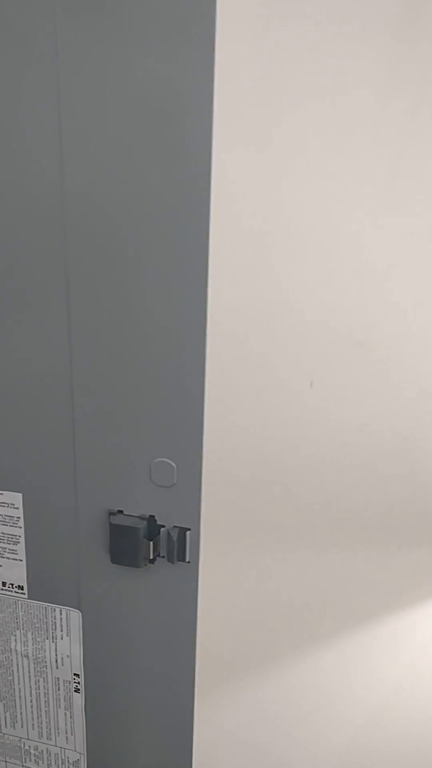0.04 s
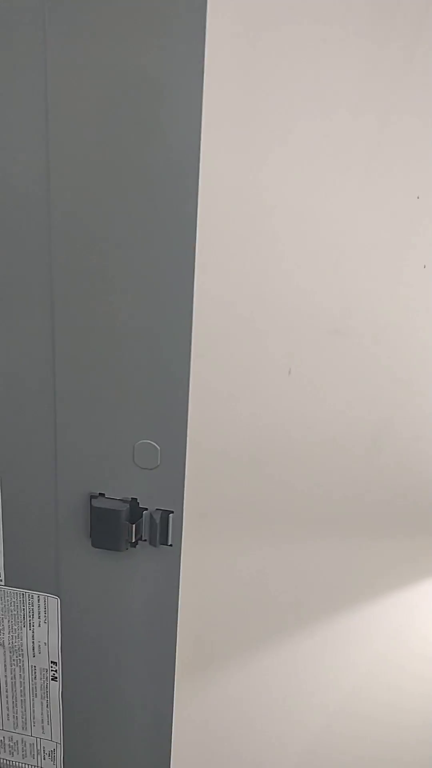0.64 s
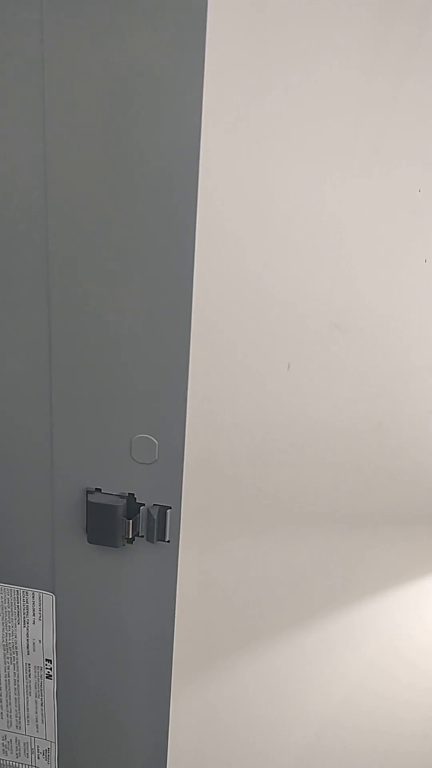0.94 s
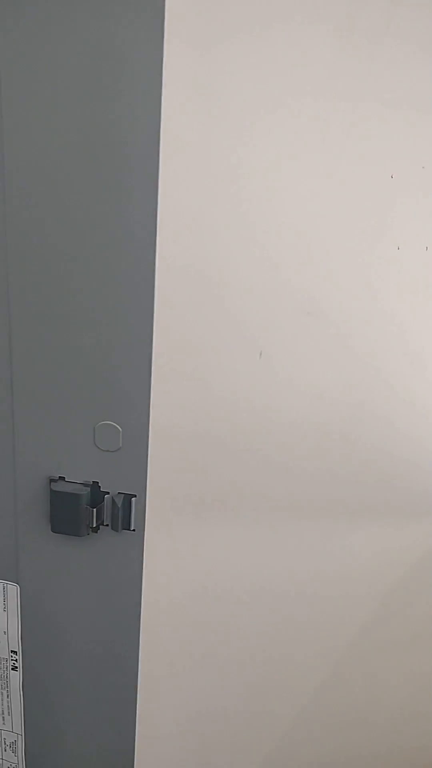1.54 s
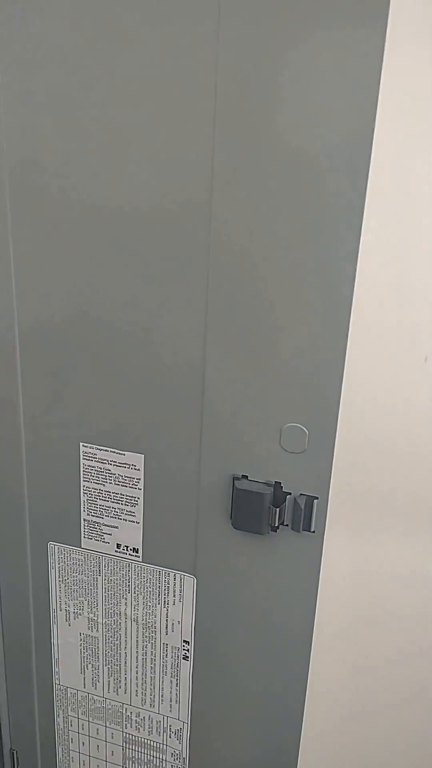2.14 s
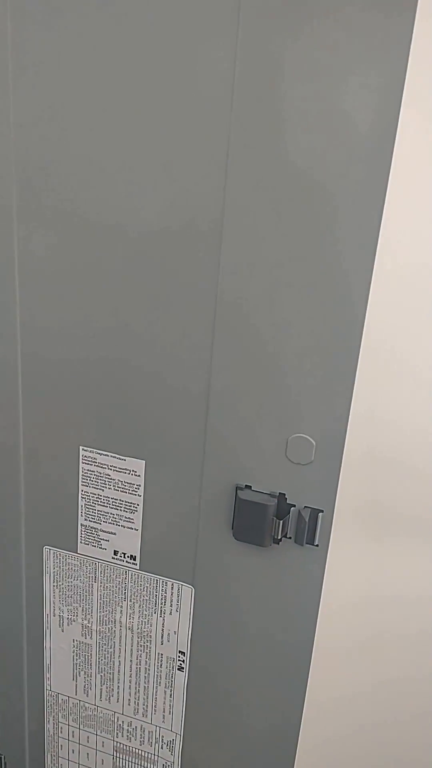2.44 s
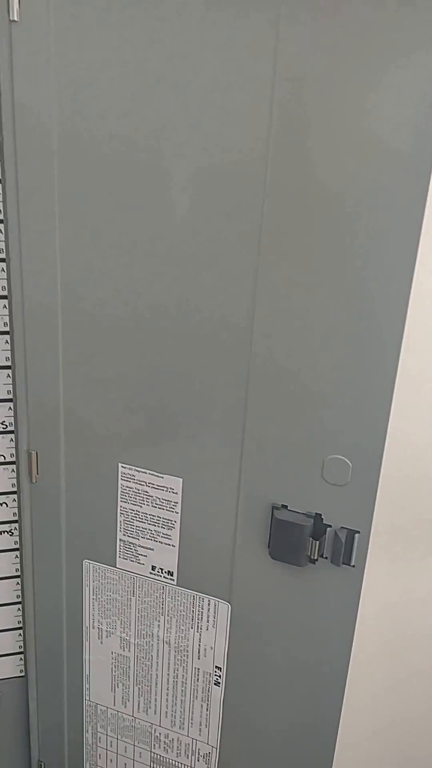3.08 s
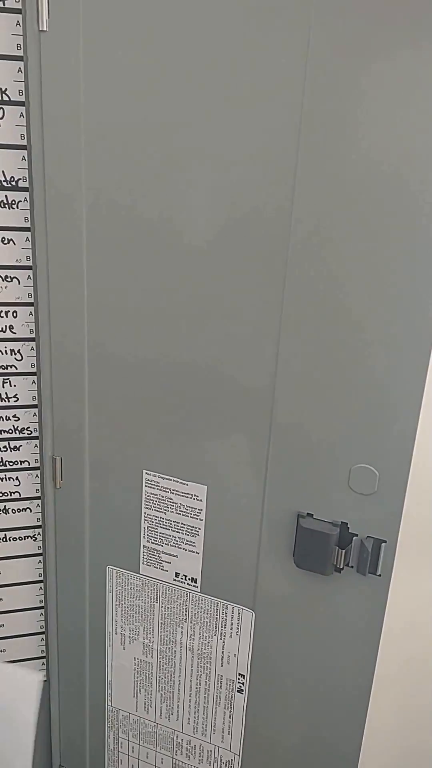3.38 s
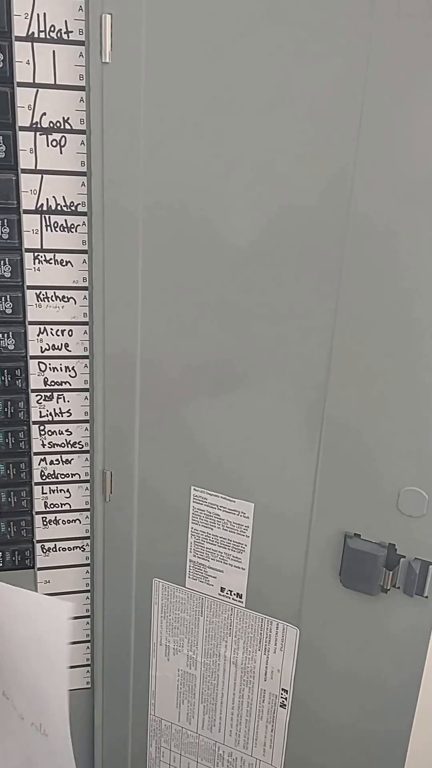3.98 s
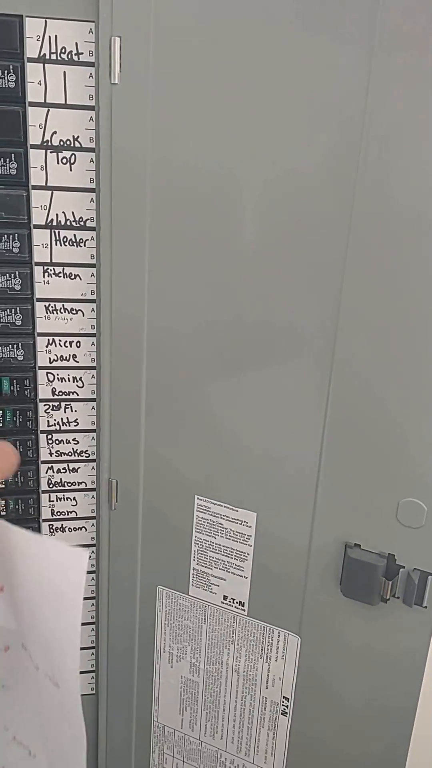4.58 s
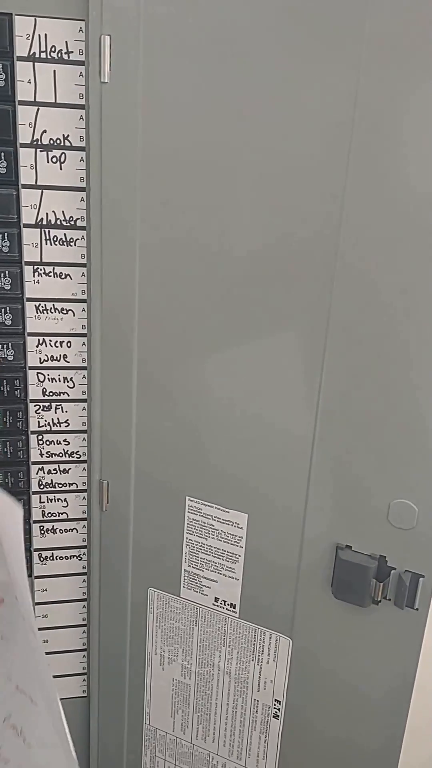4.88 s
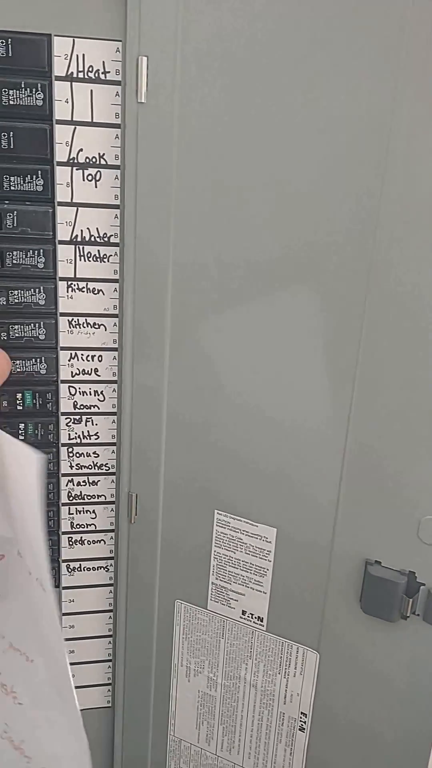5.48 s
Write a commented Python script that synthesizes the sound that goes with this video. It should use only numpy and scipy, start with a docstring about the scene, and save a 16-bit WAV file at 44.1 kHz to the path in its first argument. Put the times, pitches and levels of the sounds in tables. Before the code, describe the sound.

Close by, a hand flips circuit breakers in a steel wall panel, seventeen sharp clicks at about three a second. Each snaps with a tiny plastic rattle and a knock from the metal box. The first five clack more fully, with a hollow thud on the second; the rest are brighter. Soft bumps and rustles fall between them, over faint hiss in a small, hard room.

```python
"""Circuit breakers click in a steel wall panel, close by: a hand flips five double ones, then twelve singles.
Each spring snaps over, rattles in its plastic case and knocks the steel box; a small hard room answers. A faint
low hum swells at the start, and a hollow thud follows the second flip. Between flips the hand bumps the panel
and rustles, over a faint room hiss."""
import sys
import numpy as np
from scipy import signal
from scipy.fft import rfft, irfft
from scipy.io import wavfile
from scipy.ndimage import uniform_filter1d

SR = 44100
rng = np.random.default_rng(int(sys.argv[2]) if len(sys.argv) > 2 else 0)


def to_wav(s):
    """Save 16-bit WAV."""
    ch = np.atleast_2d(s).T  # columns
    pcm = np.round(np.clip(ch, -1, 1) * 32767)  # PCM
    wavfile.write(sys.argv[1], SR, pcm.astype(np.int16))


N = 243431
SIZE = 32768  # samples in one short sound
T, HZ = np.arange(SIZE) / SR, np.fft.rfftfreq(SIZE, 1 / SR)

# A "colour" says how strong each frequency is; "t60" is the time a sound takes to fade by 60 dB.
# colour of the room's hiss: f/Hz, level/dB
HISS_COLOUR = [(15, -45.5), (25, -11), (70, -1), (249, -3.5), (354, -2.5), (531, -11), (840, -7),
               (962, -10), (1520, -9.5), (2760, -8.5), (8140, -18.5), (9840, -25), (14400, -45),
               (16000, -54.5)]
# loudness of the hiss over time: t/s, level/dB
HISS_LEVELS = [(0, -55), (.4, -56), (2.4, -52), (4.399, -51), (4.801, -54.5), (5.5, -56)]
# how alike left and right are in sound from all around: f/Hz, likeness/0-1
LIKENESS = [(60, .97), (300, 0.84), (600, .5), (1200, 0.15), (3000, 0.02), (12000, 0)]
# how long the room echoes: f/Hz, t60/s
ECHO_T60 = [(100, 0.45), (400, 0.6), (1200, 0.65), (2700, 0.5), (5000, 0.41), (8500, 0.29), (13000, 0.21)]
# colour of the echo against the direct sound: f/Hz, level/dB
ECHO_COLOUR = [(300, 11), (1000, 4), (3000, -2.5), (6000, -1), (9000, 0.5), (14000, 4)]

# rustles of the hand: t/s, level/dB, rise/s, brightness/dB per octave
RUSTLES = [(.048, -44.5, .006, -2.5), (1.84, -45, 0.0037, 9.5), (2.255, -42.5, .018, 2),
           (2.373, -43, .002, -2)]
# colour of a rustle: f/Hz, level/dB
RUSTLE_COLOUR = [(200, -19), (700, -1.5), (1200, 1), (2000, -6), (3200, -12.5), (6000, -32), (14000, -46)]
# the hand bumps the panel, mostly as it finds the next lever: t/s, level/dB
BUMPS = [(0.366, -46.5), (0.999, -52), (1.355, -43.5), (1.695, -42), (2.229, -45.5), (2.382, -49.5),
         (2.754, -41.5), (2.795, -38), (3.045, -40.5), (3.11, -39), (4.841, -53), (5.119, -42),
         (5.17, -44.5), (5.408, -51.5)]
# colour of a bump: f/Hz, level/dB
BUMP_COLOUR = [(30, -27.5), (65, 1.5), (100, -10), (170, -0.5), (330, -5), (550, -12.5), (900, -15.5),
               (2000, -21), (5000, -40), (10000, -56)]
# tones of the faint low hum: f/Hz, height/dB
HUM_TONES = [(345, 19.5), (575, 19.5), (770, 8)]
# colour of the hollow thud: f/Hz, level/dB
THUD_COLOUR = [(30, -38.5), (62, 7.5), (110, -5.5), (350, -3.5), (550, -10.5), (900, -16), (1500, -18),
               (2800, -16), (5000, -41), (10000, -55.5)]
# tones in the thud: f/Hz, height/dB
THUD_TONES = [(759, 11.5), (1030, 7), (1410, 12), (2640, 3), (3130, 4.5)]
# colour of the hollow wall's boom: f/Hz, level/dB
WALL_COLOUR = [(25, -30), (45, -13.5), (68, 6.5), (100, 1), (170, 2), (260, -10), (500, -52)]
# tones of the steel box: f/Hz, level/dB, t60/s
BOX_TONES = [(188.8, -8.5, 0.43), (239.5, -8, 0.6), (300.5, -0.5, 0.16), (335.9, -1, .22),
             (436.2, -2.5, 0.087), (475, -6, 0.093), (759, -11, 0.1), (2614, -14, 0.45),
             (2840, -10.5, 0.62)]

# colour shared by all the plastic cases: f/Hz, level/dB
CASE_COLOUR = [(150, -31), (500, -18.5), (1000, -19.5), (1700, -14.5), (2500, -10), (4500, -7.5),
               (6500, -2.5), (9700, -2), (11000, -7.5), (13000, -12.5), (15500, -18), (16500, -40.5)]
# tones of the wide case: f/Hz, height/dB
DOUBLE_MODES = [(2830, 7), (3740, 3.5), (6890, 4.5), (7580, 6)]
# tones of the narrow case: f/Hz, height/dB
SINGLE_MODES = [(2660, 4.9), (3650, 3.3), (6450, 1.3), (7940, 3.2), (8780, 2.5), (9580, 6.2)]
# the two kinds of breaker: case tones, fizz above 10 kHz/dB, lever slide/dB, left over right/dB
DOUBLE = (DOUBLE_MODES, -2.3, -18, -0.2)
SINGLE = (SINGLE_MODES, 0.3, -22, -0.7)
# one row a flip, levels relative; the two rings depend on the breaker's seat in the panel:
# t/s, kind, snap/dB, mid-range clack/dB, lower ring/Hz, upper ring/Hz, box knock/dB, wall boom/dB
FLIPS = [(0.136, DOUBLE, -22.5, 5, 2640, 8450, -44, -48), (0.474, DOUBLE, -23.5, 3, 2640, 5630, -41.5, -50),
         (0.803, DOUBLE, -24.5, 4.5, 2545, 7590, -41, -47), (1.128, DOUBLE, -25, 6, 3770, 3950, -43, -51.5),
         (1.432, DOUBLE, -25, 5, 4140, 5990, -38.5, -50.5),
         (1.688, SINGLE, -20, -1.5, 3370, 4500, -45.5, -50.5),
         (2.01, SINGLE, -20, -2.5, 4270, 7920, -38, -51), (2.5467, SINGLE, -20.5, -3, 8340, 9490, -40, -53),
         (2.831, SINGLE, -17, -4, 2143, 6610, -38.5, -52.5),
         (3.1763, SINGLE, -18, -2, 2590, 7040, -42.5, -54.5),
         (3.491, SINGLE, -16, -2.5, 2587, 6700, -42.5, -52),
         (3.798, SINGLE, -19, -3.5, 4850, 7080, -44.5, -51.5),
         (4.119, SINGLE, -19.5, 0, 8770, 9550, -42.5, -56),
         (4.374, SINGLE, -17.5, -3, 2400, 9320, -45.5, -60),
         (4.934, SINGLE, -22, -1.5, 2587, 8360, -42, -53.5),
         (5.165, SINGLE, -21.5, -0.5, 4820, 10450, -40.5, -46.5),
         (5.503, SINGLE, -22.5, -5.5, 5920, 10600, -39.5, -45)]


def amp(db):
    """Turns decibels into a gain."""
    return 10 ** (np.asarray(db) / 20)


def unit(x):
    """Scales a sound to an energy of one per channel."""
    return x / np.sqrt(np.mean(np.sum(x ** 2, -1)) + 1e-20)


def curve(points, hz=HZ):
    """Joins (frequency, value) points on a log-frequency axis."""
    f, value = np.transpose(points)
    return np.interp(np.log(hz + 1), np.log(f + 1), value)


def peaks(tones, width_hz):
    """Turns (frequency, height) tones into peaks on a colour."""
    return sum(db / (1 + (2 * (HZ - hz) / width_hz) ** 2) for hz, db in tones)


def wiggle(shape, width):
    """Smooth random curves, typically one away from zero."""
    x = uniform_filter1d(uniform_filter1d(rng.standard_normal(shape), width), width)
    return x / x.std()


def add(mix, s, sound):
    """Mixes a stereo sound in at s seconds."""
    part = mix[:, round(s * SR):][:, :sound.shape[1]]
    part += sound[:, :part.shape[1]]


def stereo(a, b, likeness):
    """Makes left and right of a given likeness from two unrelated sounds."""
    mid, side = np.sqrt((1 + likeness) / 2) * a, np.sqrt((1 - likeness) / 2) * b
    return np.array([mid + side, mid - side])


def wide_noise(colour_db, size=SIZE):
    """Noise from all around: left and right are alike only in the bass."""
    white = rfft(rng.standard_normal((2, size)))
    spectrum = stereo(*white, curve(LIKENESS, np.fft.rfftfreq(size, 1 / SR)))
    x = irfft(spectrum * amp(colour_db), size)
    return x / x.std()


def hiss():
    """The quiet air of the room."""
    level_db = np.interp(np.arange(N) / SR, *np.transpose(HISS_LEVELS))
    return amp(level_db) * wide_noise(curve(HISS_COLOUR, np.fft.rfftfreq(N, 1 / SR)), N)


def room_echo(build_s=0.014):
    """A fresh echo from the hard walls; the treble dies first."""
    hz, t, bands = signal.stft(wide_noise(curve(ECHO_COLOUR)), SR, nperseg=256)
    fade = amp(-60 * t / curve(ECHO_T60, hz)[:, None])
    tail = signal.istft(bands * fade, SR, nperseg=256)[1][:, :SIZE]
    return unit(tail * (1 - np.exp(-T / build_s)))


def tilt(db_per_octave):
    """A slope that makes a colour brighter (above zero) or duller."""
    return db_per_octave * np.log2(HZ + 20)


def low_hum(level_db=-67.1, rise_s=0.145):
    """A faint hum of three low tones swells, then fades."""
    swell = T / rise_s * np.exp(1 - T / rise_s)
    colour = curve(BUMP_COLOUR) + peaks(HUM_TONES, width_hz=95) + tilt(0.5)
    return amp(level_db) * swell * wide_noise(colour)


def soft_contact(colour_db, level_db, rise_s, t60):
    """A soft blow has no click: a short swell of noise that dies in the room."""
    swell = np.minimum(T / rise_s, 1) * amp(-60 * np.maximum(T - rise_s, 0) / t60)
    return amp(level_db) * swell * wide_noise(colour_db)


def rustle(level_db, rise_s, brightness):
    """The hand brushes by in a brief puff of noise."""
    return soft_contact(curve(RUSTLE_COLOUR) + tilt(brightness), level_db, rise_s, t60=0.13)


def bump(level_db):
    """The hand bumps the panel, which sounds through the steel box."""
    box_db = peaks([(hz, 7) for hz, _, _ in BOX_TONES], width_hz=4.2)
    return soft_contact(curve(BUMP_COLOUR) + box_db + tilt(0.71), level_db, rise_s=0.02, t60=0.71)


def thud():
    """A deep, hollow thud with a few higher tones in it."""
    colour = curve(THUD_COLOUR) + peaks(THUD_TONES, width_hz=88)
    return soft_contact(colour, level_db=-31, rise_s=0.029, t60=0.68)


def knock(box_db, wall_db, box_gain_db=33, wall_gain_db=38, boom_rise_s=0.041, boom_t60=0.55):
    """A breaker's kick rings the steel box, which stirs the room and the hollow wall behind it."""
    ring = np.zeros(SIZE)
    for hz, db, t60 in BOX_TONES:
        louder, detune, phase = rng.standard_normal(3)  # each breaker sits elsewhere on the box
        tone = np.sin(2 * np.pi * (hz * (1 + 0.015 * detune) * T + phase))
        ring += amp(db + 1.9 * louder - 60 * T / t60) * tone
    ring = unit(ring * (1 - np.exp(-T / 0.0029)))
    onset = ring * np.exp(-T / 0.0064)
    echo = unit(signal.fftconvolve(room_echo(), onset[None], axes=1)[:, :SIZE])
    swell = (1 - np.exp(-T / boom_rise_s)) * amp(-60 * T / boom_t60)
    boom = unit(wide_noise(curve(WALL_COLOUR)) * swell)
    return amp(box_db + box_gain_db) * (ring + amp(-3) * echo) + amp(wall_db + wall_gain_db) * boom


def snap(delay_s):
    """One impact, smeared by the panel: bending waves bring the treble first, lower tones later."""
    wander = wiggle((3, len(HZ)), width=350)
    scatter = 0.0002445 * wander[0] + 0.000165 * wander[1:]  # shared, plus each channel's own
    slowness = np.sqrt(8000 / (HZ + 500))
    arrival_s = delay_s + 0.000693 * slowness + slowness ** 2 * scatter
    return irfft(np.exp(-2j * np.pi * np.cumsum(arrival_s, 1) * SR / SIZE))


def rattle(t60=0.068, rise_s=0.0012):
    """Loose parts in the case make many tiny impacts that die away."""
    impacts = rng.standard_normal((2, SIZE)) * amp(3.3 * rng.standard_normal(SIZE))
    swell = (1 - np.exp(-T / rise_s)) * amp(-60 * T / t60)
    return unit(stereo(*impacts, likeness=0.29) * swell)


def case_colour(modes, clack_db, fizz_db, rings, sharpness):
    """The colour of one plastic case; sharpness sets how much its tones stand out."""
    clack = clack_db * curve([(900, 0.68), (2400, 0.68), (4500, 0.97), (6500, 0.036)])
    fizz = fizz_db * np.clip((HZ - 10000) / 1500, 0, 1)
    ringing = np.maximum(peaks(modes, width_hz=330), peaks(rings, width_hz=300))
    blurred = uniform_filter1d(ringing, size=1100)
    colour = curve(CASE_COLOUR) + clack + fizz + blurred + sharpness * (ringing - blurred)
    bright = (HZ > 6000) & (HZ < 10500)  # every case gets the same power in this band
    return colour - 10 * np.log10(np.mean(amp(colour) ** 2 * bright))


def ringing_body(colour_db):
    """A filter with this colour that rings only after the blow, as a real body does."""
    log_gain = np.log(amp(np.r_[colour_db, colour_db[-2:0:-1]]))
    return np.exp(np.conj(signal.hilbert(log_gain)))[:len(colour_db)]


def breaker(kind, level_db, clack_db, lower_hz, upper_hz, slide_s, echo_db=-4, gain_db=29.5):
    """The lever slides past its tipping point, the contact snaps and bounces, and the case rattles."""
    modes, fizz_db, slide_db, pan_db = kind
    rings = [(lower_hz, 10.5), (upper_hz, 8.5)]  # f/Hz, height/dB
    lead = round(slide_s * SR)
    slide = unit(rng.standard_normal((2, SIZE)) * np.exp(-abs(T - slide_s) / 0.0051) * (T < slide_s))
    bounce = snap(delay_s=0.0028 * np.exp(0.3 * rng.standard_normal()))
    loose_parts = rattle()
    blow = unit(snap(0) + amp(-7.5) * bounce + amp(-1) * loose_parts)
    drive = amp(slide_db) * slide + np.roll(blow, lead, axis=1)
    ripple_db = 2.08 * wiggle(len(HZ), width=45)  # many weaker tones, different for each breaker
    direct_colour = ripple_db + case_colour(modes, clack_db, fizz_db, rings, sharpness=1)
    direct = rfft(drive) * ringing_body(direct_colour)
    # the room gathers sound sent in all directions, which evens out the tones
    echo_colour = ripple_db + case_colour(modes, clack_db, fizz_db, rings, sharpness=0.48)
    echo = rfft(np.roll(room_echo(), lead, axis=1)) * amp(echo_db + echo_colour)
    fade_out = np.clip((T[-1] - T) / 0.1, 0, 1)
    pan = amp([[pan_db / 2], [-pan_db / 2]])
    return amp(level_db + gain_db) * pan * irfft(direct + echo) * fade_out


def scene(slide_s=0.0034):
    """Breakers, knocks, bumps and rustles over the room's hiss."""
    mix = hiss()
    for s, *switch, box_db, wall_db in FLIPS:
        add(mix, s - slide_s, breaker(*switch, slide_s))
        add(mix, s, knock(box_db, wall_db))
    add(mix, FLIPS[1][0], thud())
    for s, level_db in BUMPS:
        add(mix, s, bump(level_db))
    add(mix, 0, low_hum())
    for s, *touch in RUSTLES:
        add(mix, s, rustle(*touch))
    return mix


def suppress_noise(x, depth_db=2.5, open_db=17):
    """Turns down whatever lies near each band's quiet floor, so echoes end a little early."""
    bands = signal.stft(x, SR, nperseg=512)[2]
    power = np.mean(abs(bands) ** 2, 0)
    power = uniform_filter1d(uniform_filter1d(power, size=9, axis=0), size=3, axis=1)
    level_db = 10 * np.log10(abs(power) + 1e-20)
    above_floor_db = level_db - np.percentile(level_db, 20, axis=1, keepdims=True)
    shut = np.clip(2 * (1 - above_floor_db / open_db), 0, 1)
    return signal.istft(bands * amp(-depth_db * shut), SR, nperseg=512)[1][:, :N]


def record(dry, low_cut_hz=44, high_cut_hz=16300):
    """Cuts the deep bass, lowers the noise, rounds off the loudest peaks and cuts the highest treble."""
    low_cut = signal.butter(3, low_cut_hz, "highpass", fs=SR, output="sos")
    x = suppress_noise(signal.sosfilt(low_cut, dry))
    rounded = x / (1 + x ** 6) ** (1 / 6)
    high_cut = signal.firwin(301, high_cut_hz, window=("kaiser", 9), fs=SR)
    return signal.oaconvolve(rounded, high_cut[None], "same")


dry = scene()
out = record(dry)
to_wav(out)
```